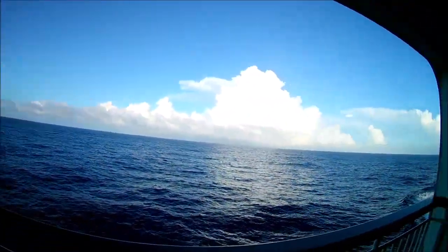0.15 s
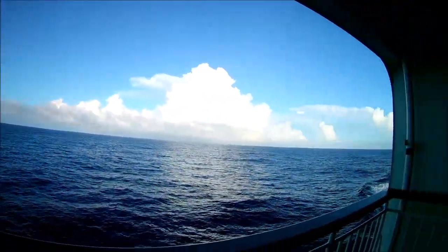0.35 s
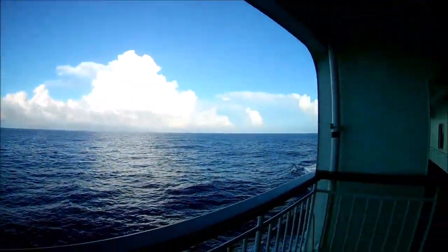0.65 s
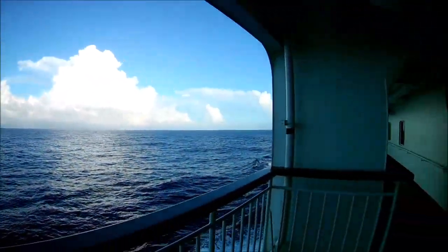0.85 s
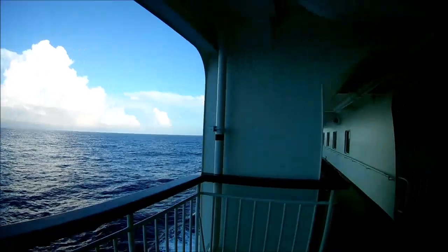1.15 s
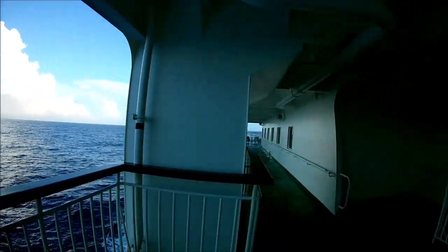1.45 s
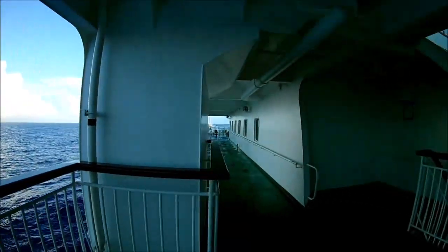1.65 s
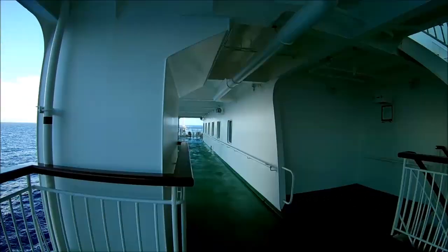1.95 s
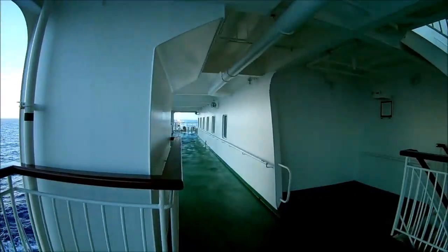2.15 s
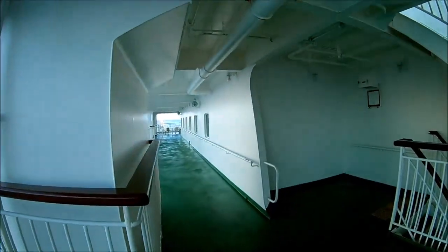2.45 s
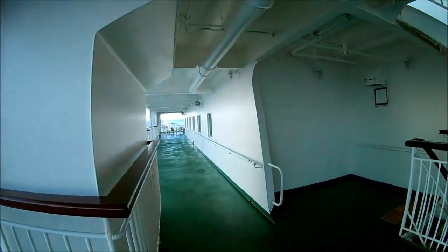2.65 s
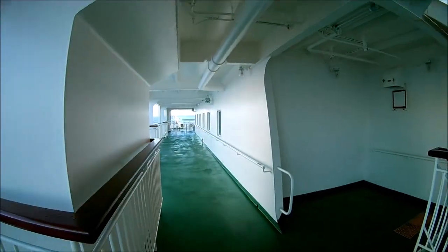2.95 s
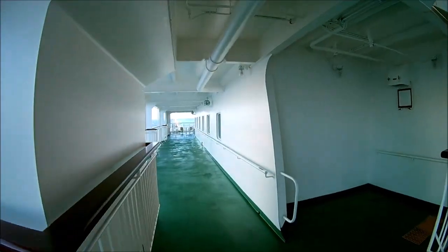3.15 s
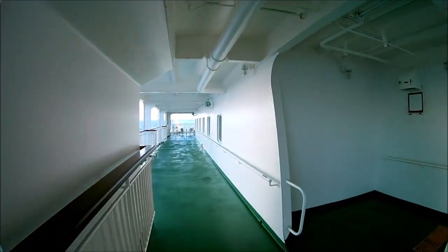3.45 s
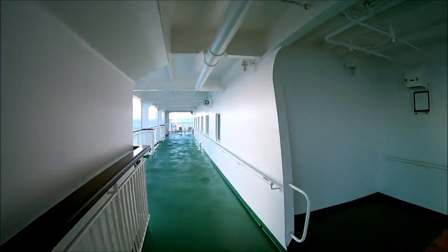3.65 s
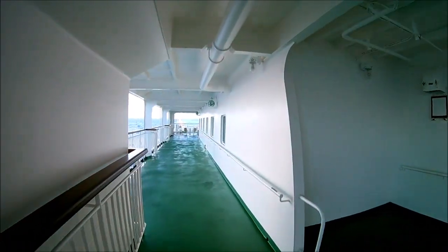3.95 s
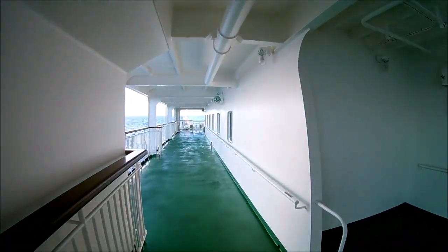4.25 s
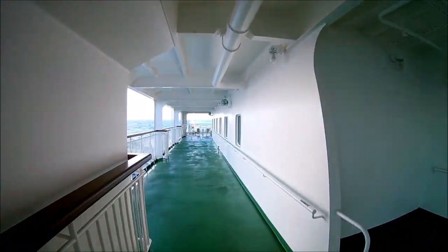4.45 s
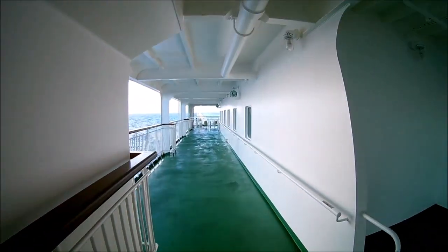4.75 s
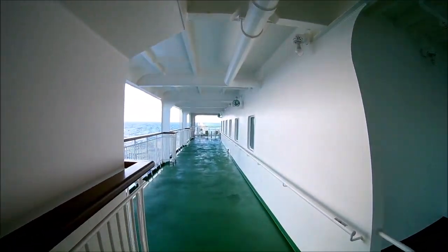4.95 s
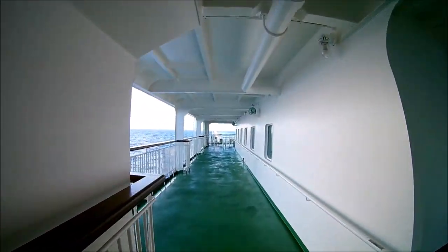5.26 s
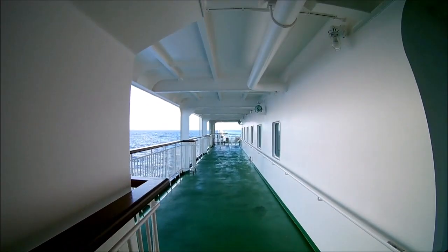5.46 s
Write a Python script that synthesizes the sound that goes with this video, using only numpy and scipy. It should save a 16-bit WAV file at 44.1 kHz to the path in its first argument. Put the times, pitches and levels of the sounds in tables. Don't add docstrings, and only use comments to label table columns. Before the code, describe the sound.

A handheld camera's small microphone picks up a continuous deep engine drone and soft broadband sea hiss. Dull, bassy wind knocks cluster early, at about 0.6, 1.4 and 1.6 seconds, followed by a calmer stretch and a fluttering burst near four seconds. The sea becomes duller beside the wall; wind in the rails whistles quietly in the last second.

```python
import sys
import numpy as np
from scipy import signal
from scipy.fft import rfft, irfft
from scipy.io import wavfile
from scipy.ndimage import uniform_filter1d

SR = 44100
rng = np.random.default_rng(int(sys.argv[2]) if len(sys.argv) > 2 else 0)


def unload_wav(signal):
    wavfile.write(
        sys.argv[1],
        SR,
        np.round(np.clip(np.atleast_2d(signal).T, -1, 1) * 32767).astype(np.int16),
    )


def volts_from_decibels(level):
    exponent = np.asarray(level, float) / 20
    return 10 ** exponent


N = 247842
T = np.arange(N) / SR


def evened(x):
    return x / np.sqrt(np.mean(x ** 2) + 1e-20)


def curves(rows):
    seconds, *columns = np.transpose(rows)
    return [np.interp(T, seconds, column) for column in columns]


def drift(rate_hz):
    rates = np.geomspace(.05, 1, num=16) * rate_hz
    coarse = T[::256]
    wave = sum(np.sin(2 * np.pi * (f * coarse + rng.random())) / np.sqrt(f) for f in rates)
    return np.interp(T, coarse, evened(wave))


def resonate(x, hz, width_hz):
    turn = np.exp(2j * np.pi * hz * T)
    r = np.exp(-np.pi * width_hz / SR)
    smooth = signal.lfilter([1 - r], [1, -r], x / turn)
    return 2 * (turn * smooth).real


def shaped(x, gain):
    margin = 2048
    wide = np.pad(x, margin, "reflect")
    spectrum = rfft(wide) * gain(np.fft.rfftfreq(len(wide), 1 / SR))
    return irfft(spectrum, len(wide))[margin:-margin]


def gusts():
    # peak time in seconds, peak level in dB, time in seconds to fall by fall_db.
    gust_rows = [(0.0, -27.5, .1), (.3, -19, .16), (.47, -25, .15), (.575, -19, .08), (.64, -12, .12),
                 (.77, -24, .2), (1.07, -28, .2), (1.33, -21, .12), (1.5, -29, .08), (1.61, -17, .11),
                 (2.1, -26, .2), (2.4, -32, .2), (2.54, -22, .07), (2.72, -37, .3), (3.08, -26, .25),
                 (3.27, -26, .15), (3.52, -25, .09), (3.78, -27, .2), (3.92, -12, .13), (4.065, -15, .11),
                 (4.14, -15, .12), (4.205, -12, .045), (4.44, -18.5, .09), (4.73, -22, .3),
                 (5.06, -25.5, .5), (5.3, -25, .25), (5.53, -23, .2)]
    fall_db, rise_share, calm_db = 20.5, .9, -53
    power = volts_from_decibels(2 * calm_db)
    for s, peak_db, length_s in gust_rows:
        away = np.maximum(T - s, (s - T) / rise_share) / length_s
        power = power + volts_from_decibels(2 * (peak_db - fall_db * np.minimum(away, 4)))
    return 10 * np.log10(power)


def lump(hz, cycles):
    u = np.arange(-2.5, 2.5, hz / cycles / SR * 2)
    return np.exp(-u ** 2) * np.cos(np.pi * cycles * u + 2 * np.pi * rng.random())


def wind(per_s=500, spread_db=1.5, calm_hz=90):
    gust_db = gusts()
    reach_hz = calm_hz * volts_from_decibels(0.26 * np.clip(gust_db + 37.5, 0, 25))
    out = np.zeros(N)
    for hz in np.geomspace(36, 1200, num=10):
        strength = volts_from_decibels(spread_db * np.minimum(rng.exponential(size=N), 4))
        push_or_pull = rng.choice([-1, 1], N)
        passing = rng.random(N) < per_s * np.sqrt(hz / 300) / SR
        hits = strength * push_or_pull * passing
        share = (1 + (hz / reach_hz) ** 2) ** -.7
        out += evened(signal.oaconvolve(hits, lump(hz, 1.2), "same")) * share
    return volts_from_decibels(gust_db - 4.5) * out / 2


def buffets():
    # time in seconds, peak level in dB, pitch in Hz.
    pushes = [(.306, -14, 110), (.329, -9.5, 130), (.569, -12, 130), (.596, -15, 61), (.613, -4, 140),
              (.637, -12, 100), (.661, -6.5, 158), (1.305, -11, 55), (1.342, -21, 100), (1.384, -7.5, 111),
              (1.594, -16, 170), (3.509, -13.5, 70), (3.863, -10.5, 250), (3.918, -9.5, 58),
              (3.954, -6.5, 75), (4.144, -12, 118), (4.183, -13, 75)]
    # time in seconds, peak level in dB, pitch in Hz.
    pulls = [(.311, -8, 98), (.494, -10, 150), (.627, -17, 89), (.645, -12.5, 102), (.656, -9.5, 250),
             (1.316, -15, 55), (1.371, -12, 90), (1.398, -13, 70), (1.648, -16, 150), (3.082, -10.5, 80),
             (4.172, -13, 75), (3.851, -7, 202), (3.873, -8, 203), (3.965, -3.5, 85), (4.067, -4.5, 90),
             (4.213, -4, 80)]
    # time in seconds, peak level in dB, pitch in Hz.
    flutters = [(1.381, -15, 330), (3.889, -22, 900), (3.895, -10.5, 285), (3.91, -13, 70),
                (3.925, -5.5, 236), (3.94, -17, 475), (3.994, -11, 460), (4.067, -14, 620),
                (4.121, -9.5, 170), (4.10, -14, 135), (4.206, -11, 440)]
    out = np.zeros(N)
    for way, rows in ((1, pushes), (-1, pulls), (0, flutters)):
        for s, peak_db, hz in rows:
            if way:
                u = np.arange(-7, 7, 6 * hz / SR)
                peak = np.exp(.2 * u - 1.2 * np.sqrt(u ** 2 + .15)) * np.cos(.9 * u)
                swing = 1.83 * way * peak
            else:
                swing = lump(hz, .8 + hz / 500)
            start = round(s * SR) - len(swing) // 2
            out[start:start + len(swing)] += volts_from_decibels(peak_db) * swing
    return out


def engines():
    # pitch in Hz, width in Hz, level in dB.
    plates = [
        (35.3, 21, -33.5),
        (60, 30, -35),
        (138, 24, -33.5),
        (161.5, 14, -43),
        (183.2, 27.4, -35),
        (256.4, 47, -39),
        (326.3, 54, -38),
    ]
    # time in seconds, level in dB.
    machinery = [
        (0, 0.5),
        (1, 0.2),
        (2, -0.2),
        (3, -0.4),
        (4, 0.5),
        (4.7, -0.1),
        (5.62, 1.5),
    ]
    # pitch in Hz, wander in dB, wander rate in Hz.
    tones = [
        (32.76, .5, 0.68),
        (37.45, 1.0, 1.2),
        (161.3, 2.5, 4.0),
        (140.03, 0.5, 2.0),
        (126.3, 1.5, 3.9),
    ]
    # mean level in dB rms, swing in dB, loudest time in seconds, period in seconds.
    swells = [
        (-27.5, 2, 3.7, 5.2),
        (-35, 4, 1.3, 5.4),
        (-35.5, 3, .3, 1.82),
        (-39, 6, 2.5, 4.4),
        (-45, 10, 5.7, 7),
    ]
    in_step_s = 1.975
    ringing = np.zeros(N)
    for hz, width_hz, db in plates:
        noise = rng.standard_normal(N)
        once = resonate(noise, hz, 1.5 * width_hz)
        ringing += volts_from_decibels(db) * evened(resonate(once, hz, 1.5 * width_hz))
    out = ringing * volts_from_decibels(curves(machinery)[0])
    for (hz, wander_db, rate_hz), (mean_db, swing_db, loudest_s, period_s) in zip(tones, swells):
        db = mean_db + swing_db * np.cos(2 * np.pi * (T - loudest_s) / period_s)
        phase = 2 * np.pi * hz * (T - in_step_s) + 0.14 * wander_db * drift(rate_hz)
        out += np.sqrt(2) * volts_from_decibels(db + wander_db * drift(rate_hz)) * np.sin(phase)
    return out


def sea(patchy_db=0.36):
    # time in seconds, level in dB.
    loudness = [(0, -38), (.3, -35), (.57, -31.5), (.8, -34.5), (1.24, -33), (1.8, -35), (2.4, -37.5),
                (3, -38.5), (3.65, -39.5), (4.8, -39.5), (5.2, -37.5), (5.62, -38)]
    # pitch in Hz, density in dB per Hz.
    spray_colour = [(40, -14.5), (100, -12), (230, -1.5), (400, 1), (700, -2.5), (1100, -5), (1700, -10.5),
                    (2400, -17.5), (4000, -27), (7000, -45.5), (9000, -54.5), (11000, -59.5), (13000, -72),
                    (15500, -82)]
    # time in seconds, brightness in dB per octave.
    shade = [
        (0, .6),
        (2.5, .2),
        (3.7, -1.4),
        (4.8, -1.5),
        (5.62, -.3),
    ]
    size, hop = 1024, 256
    frames = N // hop + 5
    hz = np.fft.rfftfreq(size, 1 / SR)
    t = np.arange(frames) * hop / SR
    a, b, patches = rng.standard_normal((frames, len(hz), 3)).T
    patches = uniform_filter1d(patches, size=12, axis=0)
    patches = evened(uniform_filter1d(patches, size=14, axis=1))
    f, colour_db = np.transpose(spray_colour)
    s, level_db = np.transpose(loudness)
    octaves = np.log2(np.maximum(hz, 250) / 1500)[:, None]
    plain_db = np.interp(np.log(hz + 1), np.log(f), colour_db, left=-40)[:, None]
    field_db = plain_db + np.interp(t, *np.transpose(shade)) * octaves
    field = volts_from_decibels(field_db) / np.sqrt(np.mean(volts_from_decibels(field_db[21:65].mean(1)) ** 2))
    z = (a + 1j * b) * field * volts_from_decibels(np.interp(t, s, level_db) + patchy_db * patches + 16.0)
    return signal.istft(z / np.sqrt(size), nperseg=size, noverlap=size - hop)[1][:N]


def moan(wobble_db=2.5):
    # time in seconds, pitch in Hz, level in dB.
    whistle = [
        (4.62, 318, -60),
        (4.75, 328, -39),
        (4.95, 354, -37),
        (5.1, 360, -40),
        (5.22, 378, -41),
        (5.35, 370, -50),
        (5.48, 335, -39),
        (5.62, 350, -39),
    ]
    hz, db = curves(whistle)
    phase = 2 * np.pi * np.cumsum(hz + 4 * drift(15)) / SR
    return np.sqrt(2) * volts_from_decibels(db + wobble_db * drift(12)) * np.sin(phase)


def scene():
    air = shaped(wind() + buffets(), lambda hz: 1 / (1 + (hz / 1600) ** 6))
    return (air + engines() + sea() + moan())[None]


def microphone(sound):
    # pitch in Hz, width in Hz, level in dB.
    case = [
        (3203, 444, -9),
        (3890, 190, 2),
        (7900, 296, -14),
    ]
    self_noise_db = -79.5

    def colour(hz):
        notch_db = sum(db * np.exp(-.5 * ((hz - f) / w) ** 2) for f, w, db in case)
        bass_cut = hz ** 2 / (hz ** 2 + 14. ** 2)
        return volts_from_decibels(notch_db) * bass_cut

    low = shaped(sound, lambda hz: 1. * (hz < 1500))
    softened = sound - low + .9 * np.tanh(low / .9)
    return shaped(softened, colour) + volts_from_decibels(self_noise_db) * rng.standard_normal(N)


def treble_dropouts(heard):
    # middle in seconds, length in frames.
    starved = [(.390, 1), (.838, 3), (.965, 1), (1.008, 1), (1.094, 1), (1.478, 1), (1.862, 1), (1.905, 1),
               (2.118, 1), (2.374, 1), (2.844, 1), (3.097, 1.35), (3.334, 1), (3.398, 1), (3.782, 1),
               (4.080, 1.25), (4.571, 1), (4.743, 1), (5.019, 1), (5.168, 1), (5.613, 1)]
    frame_s, overlap_s, fade_s = 1024 / 48000, .0115, .014
    out = heard.copy()
    for s, lost in starved:
        length_s = lost * frame_s + overlap_s
        first = max(round((s - .06) * SR), 0)
        part = slice(first, first + 5400)
        strips = rng.random(200) < .4

        def weak_bands(hz):
            narrow = (hz > 2900) & strips[(hz // 150).astype(int)]
            dip = abs(hz - 3300) < 250
            return narrow | dip | (hz > 5350)

        weak = shaped(heard[part], weak_bands)
        inward = np.clip((length_s / 2 - abs(T[part] - s)) / fade_s, 0, 1)
        out[part] -= (1 - np.cos(np.pi / 2 * inward)) * weak
    return out


def low_pass(x):
    return signal.sosfilt(signal.butter(12, 15750, fs=SR, output="sos"), x)


def record(dry):
    out = treble_dropouts(microphone(dry[0]))
    wake_s = .004
    out = out * np.minimum(.8 + T / wake_s, 1)
    return low_pass(out[None])


dry = scene()
out = record(dry)
unload_wav(out)
```